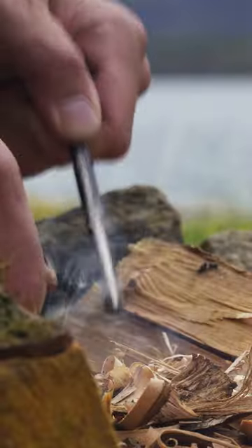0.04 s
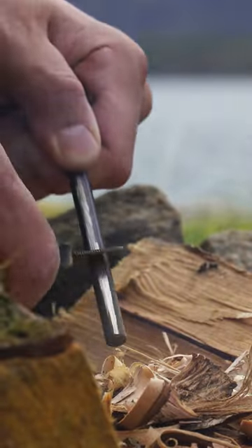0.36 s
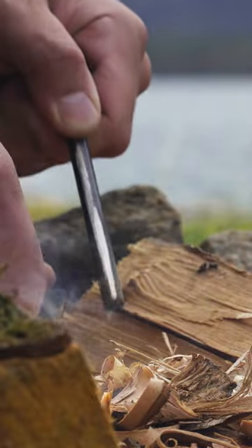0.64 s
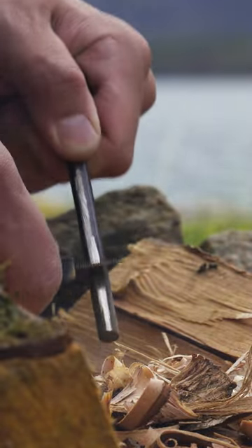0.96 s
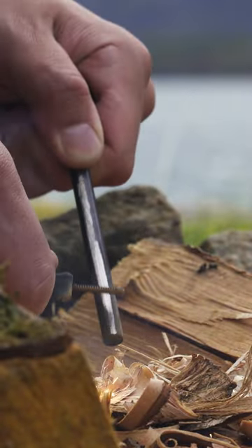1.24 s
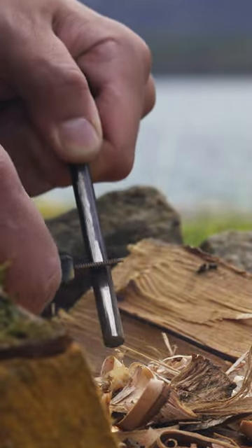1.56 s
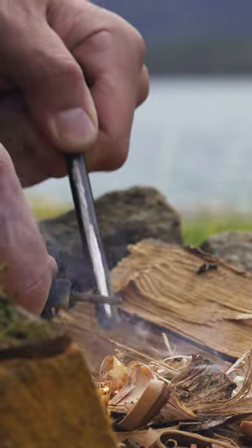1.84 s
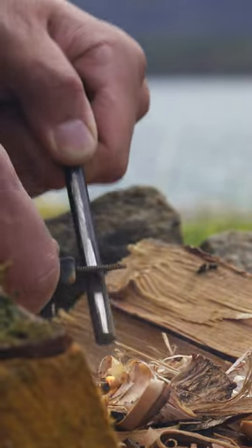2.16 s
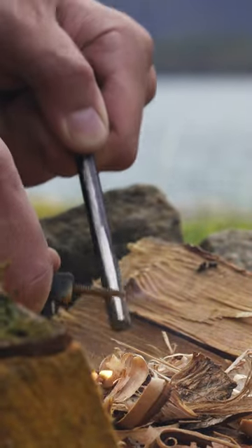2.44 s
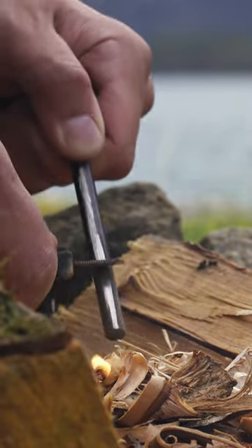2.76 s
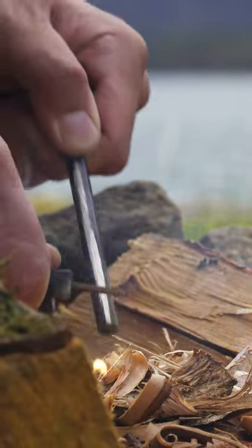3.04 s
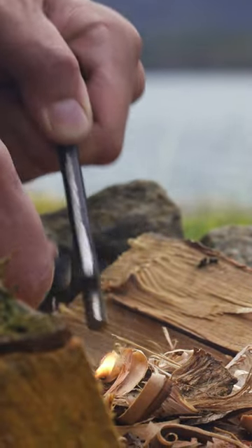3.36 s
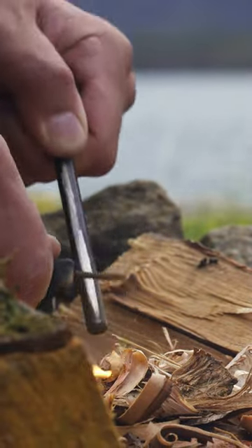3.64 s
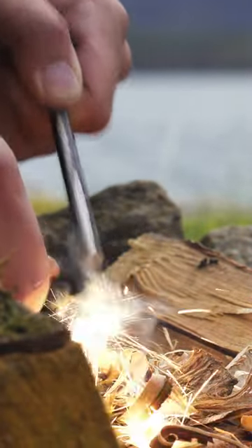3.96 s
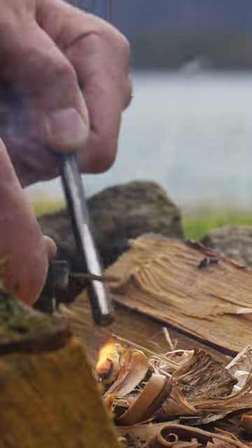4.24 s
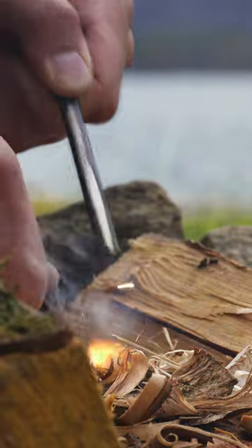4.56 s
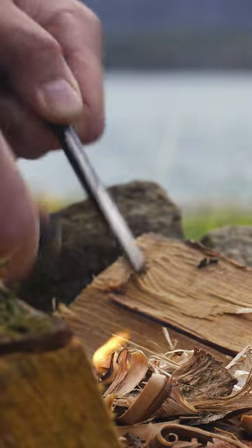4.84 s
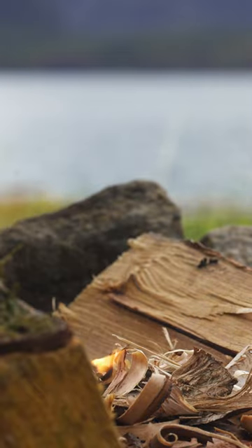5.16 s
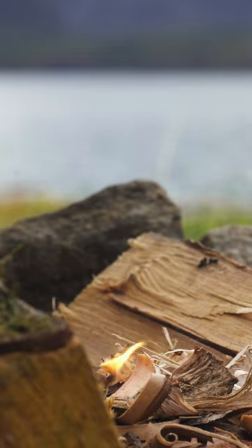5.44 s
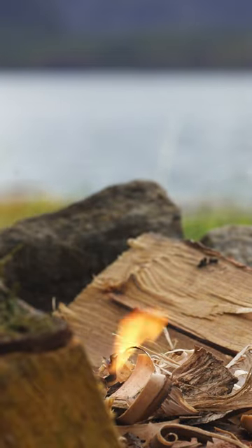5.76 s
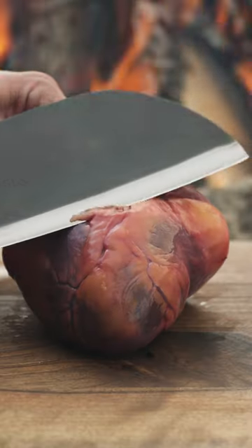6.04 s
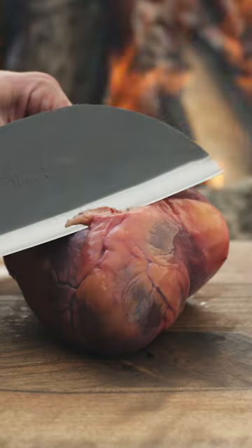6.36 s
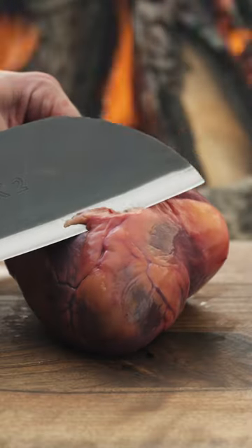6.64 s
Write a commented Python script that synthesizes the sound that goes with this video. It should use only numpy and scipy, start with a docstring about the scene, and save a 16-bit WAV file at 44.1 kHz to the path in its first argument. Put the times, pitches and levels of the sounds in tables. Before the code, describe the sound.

A steel striker rasps down a fire rod nine times with fizzing sparks, in light wind, until a wood fire starts crackling.

```python
"""A sharp, fizzing rasp, close by: a steel striker scraped down a ferro rod over wood shavings,
nine times, on a breezy lake shore. Each stroke is a rush of tiny stick-slip fractures that rings
the steel and the log beneath and throws sparks; between strokes the striker slides back, snags,
squeals and taps the rod. Towards the end the tinder catches and a wood fire swells and crackles."""
import sys
import numpy as np
from scipy import signal
from scipy.fft import rfft, irfft
from scipy.io import wavfile

SR = 44100
rng = np.random.default_rng(int(sys.argv[2]) if len(sys.argv) > 2 else 0)


def wrap_up_sound(samples):
    """Save the sound to the file named by the first command line argument, as 16-bit audio."""
    columns = np.atleast_2d(samples).T
    # keep every value between -1 and 1, then stretch to whole-number steps
    tamed = np.clip(columns, -1, 1)
    steps = np.round(tamed * 32767).astype(np.int16)
    wavfile.write(sys.argv[1], SR, steps)


N = 295469
TIME = np.arange(N) / SR


def undb(db):
    """Decibels to gain."""
    return 10 ** (np.asarray(db) / 20)


def unit(x):
    """Scale to rms 1."""
    return x / np.sqrt(np.mean(x ** 2))


def since(s):
    """Seconds gone by since time s; zero before it."""
    return np.maximum(TIME - s, 0)


def curve(rows):
    """Gain over time from (s, dB) rows."""
    return undb(np.interp(TIME, *np.transpose(rows)))


def swell(s, half):
    """Bell-shaped envelope that peaks at s and is down to 1/e half seconds to either side."""
    return np.exp(-((TIME - s) / half) ** 2)


def add(out, s, sound):
    """Mix a short sound into out from time s on."""
    start = max(int(s * SR), 0)
    part = sound[:max(N - start, 0)]
    out[start:start + len(part)] += part


def wander(rate):
    """Random drift of rms 1 that heads for a new value rate times a second."""
    knots = rng.standard_normal(N // 8)
    return unit(np.interp(TIME * rate, np.arange(len(knots)), knots))


def ring(x, modes):
    """Pass x through damped resonances (Hz, width Hz, dB), keeping the power of white noise."""
    size = 4096
    f = np.arange(1, size // 2 + 2) * SR / size
    power = sum(undb(db) ** 2 / (1 + ((f * f - hz * hz) / (f * width)) ** 2 / 2) ** 2
                for hz, width, db in modes)
    # a struck thing rings only after the blow: make the response causal
    cepstrum = irfft(np.log(power + 1e-9) / 2)
    cepstrum[1:size // 2] *= 2
    cepstrum[size // 2 + 1:] = 0
    response = irfft(np.exp(rfft(cepstrum)))
    return signal.oaconvolve(x, response / np.linalg.norm(response))[:len(x)]


def grit(rate, spread_db, smooth):
    """Tiny fractures of uneven size, rate a second, over a share of smooth rubbing noise."""
    hit = rng.random(N) < rate / SR
    size = undb(spread_db * np.minimum(rng.standard_normal(N), 2)) * rng.choice([-1, 1], N)
    return unit(unit(hit * size) + smooth * rng.standard_normal(N))


def bursts(rows, rise, t60):
    """Envelope of short bursts from (s, dB) rows; rise and t60 are in seconds."""
    out, t = np.zeros(N), TIME[:SR // 10]
    for s, db in rows:
        add(out, s, undb(db) * np.exp(-np.log(1000) * t / t60) * (1 - np.exp(-t / rise)))
    return out


def air(spectrum, flicker_db, flicker_rate):
    """Turbulent noise of a given colour whose octave bands flicker on their own."""
    f = np.arange(1, N // 2 + 2) * SR / N
    hz, db = np.transpose(spectrum)
    noise = rfft(rng.standard_normal(N)) * undb(np.interp(np.log(f), np.log(hz), db))
    octave = np.log2(f / f[-1])
    bands = (irfft(noise * np.maximum(1 - abs(octave + k), 0), N) for k in range(11))
    return unit(sum(band * undb(flicker_db * wander(flicker_rate)) for band in bands))


def press(s, attack, hold, release, build_db=0):
    """Pressure of the edge on the rod as a gain: it lands at s, bears down, holds and eases off."""
    landing_s, attack_db, release_db = 0.001, 11, 22
    t = since(s)
    on, gain = (t > 0) & (t < attack + hold + 2 * release), np.zeros(N)
    t = t[on]
    rising = np.maximum(1 - t / attack, 0)
    building = np.minimum(t / (attack + hold), 1) - .5
    easing = np.maximum((t - attack - hold) / release, 0)
    touching = np.minimum(t / landing_s, 1) * np.minimum(2 - easing, 1)
    gain[on] = touching * undb(build_db * building - attack_db * rising - release_db * easing)
    return gain


# The scrape's three colours. Each row: centre in Hz, width in Hz, relative level in dB.
STEEL_MODES = [(1573, 280, -3.5), (1850, 120, -5), (2250, 560, -3.5), (2820, 620, -12), (3585, 540, -2),
               (3670, 48, -6.5), (4020, 100, -4), (4360, 27, -1.5), (4700, 76, -6), (4620, 1220, -2.5),
               (5120, 63, -25), (6070, 530, -9.5), (7200, 910, -9.5)]  # the bright ring of rod and striker
BODY_MODES = [(176.4, 120, -2.5), (311, 108, 0.5), (472, 125, 0.5), (832, 192, 3), (980, 75, -7)]  # the low weight of hands and log
FIZZ_BANDS = [(7130, 490, -2), (8120, 120, 4.5), (8520, 2700, -4), (9800, 2400, 0), (12200, 1100, -1),
              (13850, 230, 0.5), (13700, 2300, -5.5), (14600, 1200, -5)]  # the sizzle of shavings and sparks
# Hard strokes. Each row: start, attack, hold and release in seconds, rasp level in dB,
# body and fizz sends in dB, level of the smoulder left behind in dB.
STROKES = [ (0.0, 0.00089, 0.041, 0.025, -30, -4.5, -11.5, -54.5),
           (0.556, 0.013, 0.059, 0.027, -31, -3, -6.5, -73),
           (1.083, 0.0044, 0.046, 0.034, -31, -4, -7.5, -73),
           (1.702, 0.0075, 0.038, 0.019, -28.5, -3.5, -6.5, -52.5),
           (2.322, .04, 0.033, 0.021, -33, -2.5, -8.5, -66.5),
           (2.904, 0.012, 0.03, 0.054, -28, -4.5, -8.5, -78),
           (3.495, 0.0037, 0.057, .022, -35.5, -3.5, -10, -61.5),
           (3.975, 0.017, 0.051, 0.044, -28, -4.5, -5.5, -58),
           (4.538, 0.019, 0.042, 0.022, -29.5, -4.5, -8, -73), ]


def strokes():
    """The edge bites and chatters down the rod; the shavings ignite, the first fizzing brightest."""
    flash_db, flash_s = 11, 0.0098
    rasp, body, fizz = np.zeros((3, N))
    for s, attack, hold, release, db, body_db, fizz_db, _ in STROKES:
        force = undb(db) * press(s, attack, hold, release)
        rasp += force
        body += force * undb(body_db)
        fizz += force * undb(fizz_db + flash_db * np.exp(-since(s) / flash_s))
    chatter = unit(undb(2.57 * wander(420)))
    fractures = grit(rate=3200, spread_db=3.5, smooth=0.46) * chatter
    sparks = unit(fractures + 2.7 * chatter * grit(rate=2200, spread_db=5.5, smooth=0.92))
    return (ring(fractures * rasp, STEEL_MODES)
            + undb(0.6) * ring(fractures * body, BODY_MODES)
            + undb(0.5) * ring(sparks * fizz, FIZZ_BANDS))


def hand_echoes(x, share, drift_s):
    """Echoes off the moving hands and the log give the scrape a shifting metallic colour."""
    delays = (lag_s + drift_s * wander(4.4) for lag_s in (.0005, .0011, .0019))
    echoes = sum(np.interp(TIME - delay, TIME, x) for delay in delays)
    return (x + share * echoes) / np.sqrt(1 + 3 * share ** 2)


# The shore's bed of wind and water. Each row: frequency in Hz, relative level in dB.
SHORE_SPECTRUM = [(15, -32), (25, -18), (206, -11), (270, -11), (335, -8.5), (476, -11), (734, -15),
                  (1160, -22.5), (1480, -19), (2050, -28), (4030, -31), (4370, -30.5), (9570, -38),
                  (16000, -45)]
# Low bumps and buffets on the microphone.
# Each row: peak time in seconds, level in dB, half length in seconds.
BUFFETS = [(1.42, -43.5, .015), (1.552, -44.5, 0.011), (1.601, -39.5, 0.019), (2.677, -50.5, 0.083),
           (2.96, -38.5, 0.025), (3.122, -45, 0.027), (3.86, -36, 0.01), (4.12, -48, 0.011),
           (4.808, -40, 0.02), (5.139, -37, 0.0037), (5.303, -45, 0.015), (5.386, -51, 0.033),
           (6.007, -41.5, .06)]


def breeze():
    """Wind and water wash under a slowly building rumble, with short low bumps and buffets."""
    wash = undb(-53.5) * air(SHORE_SPECTRUM, flicker_db=4.0, flicker_rate=13)
    # every buffet rides on a weaker, longer swell of rumble
    swells = sum(undb(db - 12.5) * swell(s, 5 * half) for s, db, half in BUFFETS)
    wind = undb(-73 + 3 * TIME) + swells
    rumble = ring(rng.standard_normal(N), [(39.8, 31.5, -5), (80, 76, -24)])
    rumble *= wind * undb(2 * wander(4.8))
    bumps = sum(undb(db) * swell(s, half) for s, db, half in BUFFETS)
    thump_hz = 66 * 2 ** (0.7 * wander(110))  # a low thump of wavering pitch
    thump = unit(np.sin(2 * np.pi * np.cumsum(thump_hz) / SR))
    low_noise = undb(-12) * ring(rng.standard_normal(N), [(151, 150, 1)])
    return wash + rumble + bumps * (thump + low_noise)


def tinder():
    """Scorched shavings hiss and stray sparks tick after each stroke; at last the tinder catches."""
    ember_db, smoulder_s = -75.5, 0.12
    alight_db, alight_s = -65.5, 4.94
    glow = undb(ember_db) + undb(alight_db) * (TIME > alight_s)
    shower = np.zeros(N)
    for s, attack, hold, release, *_, smoulder_db in STROKES:
        t = since(s + attack + hold + release)
        glow += (t > 0) * undb(smoulder_db) * np.exp(-(t / smoulder_s) ** 2)
        shower += (t > 0) * np.exp(-t / 0.054)
    sizzle = grit(rate=2500, spread_db=10, smooth=0.84)
    hiss = ring(sizzle, [(3900, 3700, 7), (8000, 4000, -5), (12600, 6500, -3)]) * glow
    ticks = grit(rate=120, spread_db=10, smooth=0.15) * shower
    sparks = ring(ticks, [(4200, 8500, 7), (11200, 3900, -14)])
    # the first shower flares with a soft puff
    puff = ring(rng.standard_normal(N), [(187, 125, 2), (700, 1100, -14.5)]) * swell(0.16, 0.1)
    return hiss + undb(-54) * sparks + undb(-49) * puff


# Sharp catches of the edge. Each row: start in seconds, relative level in dB, fizz send in dB.
SNAGS = [(0.0693, -30, -7), (0.2268, -33.5, -9), (0.5502, -23.5, 5.5), (0.6142, -15, -19),
         (0.634, -17, -20), (0.6728, -24, -8), (0.6954, -30, -11), (0.7441, -20, -7), (0.7535, -24, -11),
         (0.902, -31, -18), (0.915, -27.5, -11), (0.932, -31, -8), (1.123, -11, -15), (1.158, -26, -11),
         (1.231, -25, -12), (1.409, -18, -23), (1.453, -15, -15), (1.4658, -21, -11), (1.5101, -24, -11.5),
         (1.6489, -14, -13), (1.689, -16, -5), (1.7495, -18, -13), (1.951, -30.5, -15), (1.971, -28.5, -13),
         (2.0001, -20, -17), (2.1273, -25, -12.5), (2.1428, -29.5, -22), (2.3237, -18.5, -12.5),
         (2.4215, -15.5, -15), (2.445, -19.5, -22), (2.4813, -22, -12), (2.5339, -21.5, -15),
         (2.541, -21.5, -19), (2.5524, -26, -14), (2.571, -30, -15), (2.5854, -27.5, -13), (2.598, -30, -9),
         (2.6638, -35, -14.5), (2.9005, -25, -2), (2.9988, -22.5, -10), (3.024, -19, -14),
         (3.1064, -26.5, -6.5), (3.198, -25.5, -9.5), (3.3305, -30, -22), (3.457, -25, -11),
         (4.0696, -28.5, -12), (4.0928, -18, -8.5), (4.1437, -35, -13), (4.2446, -28, -17),
         (4.286, -17, -15.5), (4.3065, -22, -25), (4.3306, -24.5, -19), (4.5944, -13.5, -19),
         (4.682, -29.5, -17), (4.945, -20, -10.5), (4.953, -30, -12)]


def snags():
    """A caught edge tears free in a few milliseconds of dense fractures."""
    tear = grit(rate=9000, spread_db=1.5, smooth=0.67)
    rasp = tear * bursts([(s, db) for s, db, _ in SNAGS], rise=0.00042, t60=0.02)
    fizz = tear * bursts([(s, db + send) for s, db, send in SNAGS], rise=0.00036, t60=0.017)
    return (undb(-8.5) * ring(rasp, STEEL_MODES)
            + undb(-16) * ring(rasp, BODY_MODES)
            + undb(-0.5) * ring(fizz, FIZZ_BANDS))


# The striker's free ring. Each row: centre in Hz, width in Hz, relative level in dB.
STRIKER_MODES = [(1310, 300, -5), (2335, 430, 2), (2940, 270, -3), (3620, 350, 2), (4050, 370, -0.5),
                 (4950, 630, 0), (5950, 590, -6.5), (7100, 1100, -10), (12000, 3200, -26)]
# Small steel clicks. Each row: start in seconds, relative level in dB.
TAPS = [(0.389, -22.5), (0.5124, -31), (0.5208, -28), (0.5397, -27), (0.7325, -27.5), (0.977, -29.5),
        (2.211, -20.5), (2.79, -33), (2.8858, -33), (3.8891, -15.5), (4.4569, -18), (4.704, -39)]


def taps():
    """The striker is set against the rod: one clean blow and a brief rattle ring it."""
    blows = np.zeros(N)
    for s, db in TAPS:
        blows[int(s * SR)] = undb(db)
    rattle = rng.standard_normal(N) * bursts(TAPS, rise=0.00029, t60=0.012)
    return ring(undb(5) * blows + undb(-13.5) * rattle, STRIKER_MODES)


# Soft lead-ins. Each row: start, attack and hold in seconds, relative level in dB, fizz send in dB.
SKIMS = [ (0.474, .008, 0.017, -52, -4), (1.023, 0.031, .032, -40, 0.5), (1.643, .003, 0.058, -36.5, -5),
         (2.234, .032, 0.058, -40.5, 1.5), (3.397, 0.019, 0.075, -42.5, -1),
         (3.938, 0.036, .006, -33.5, -2.5), ]


def skims():
    """Before it digs in, the edge glides with a fine, even hiss."""
    hiss_bands = [(770, 1200, -5.5), (2380, 600, 0.5), (3530, 1000, 4.5), (5560, 1300, 0)]
    hiss, fizz = np.zeros((2, N))
    for s, attack, hold, db, fizz_db in SKIMS:
        force = undb(db) * press(s, attack, hold, release=0.008)
        hiss += force
        fizz += force * undb(fizz_db)
    rub = grit(rate=5000, spread_db=-3, smooth=0.82) * unit(undb(2.0 * wander(200)))
    return undb(-3.5) * ring(rub * hiss, hiss_bands) + undb(-5.5) * ring(rub * fizz, FIZZ_BANDS)


# Thin squeaks. Each row: centre time and half length in seconds, pitch in Hz, relative level in dB.
SQUEALS = [(0.519, 0.023, 2900, -52), (0.559, 0.0061, 7000, -46), (1.051, 0.014, 6800, -46),
           (1.068, 0.018, 13400, -47), (1.657, 0.013, 6700, -40), (1.698, 0.0077, 13400, -32),
           (2.284, 0.027, 13200, -45), (2.378, 0.015, 6500, -37.5), (2.886, 0.021, 2320, -52.5),
           (2.901, 0.0044, 6750, -32), (3.272, .06, 12000, -60), (3.431, 0.021, 13100, -44.5),
           (3.96, 0.013, 6840, -43.5), (4.542, 0.018, 3180, -44), (4.552, 0.013, 13600, -40)]


def squeals():
    """Friction briefly locks onto a resonance of the steel: a rough, narrow whistle."""
    out, t = np.zeros(N), TIME[:SR // 2]
    middle, catching = t[-1] / 2, np.tanh(wander(350))
    for s, half, hz, db in SQUEALS:
        flutter = undb(10.3 * catching[int(s * SR):][:len(t)])
        whistle = ring(rng.standard_normal(len(t)), [(hz, 450 + 0.048 * hz, 0)])
        envelope = undb(db) * np.exp(-((t - middle) / half) ** 2)
        add(out, s - middle, whistle * flutter * envelope)
    return out


# Light slides along the rod. Each row: start, hold and release in seconds, rasp level in dB,
# body and fizz sends in dB.
SLIDES = [ (0.671, 0.01, 0.051, -47.5, 3, -6), (0.88, 0.011, 0.047, -42.5, -7, -2.5),
          (1.228, 0.03, 0.037, -35.5, -4, -5), (1.295, 0.096, 0.088, -40, -4, -5),
          (1.755, 0.066, 0.072, -35.5, -2.5, -5), (1.925, 0.0037, 0.011, -39.5, -4, -1.5),
          (2.422, 0.065, 0.0055, -44, -0.5, -3), (3.012, 0.042, 0.016, -40, -1.5, -2),
          (3.192, 0.14, .018, -43.5, -4.5, -4.5), (4.153, 0.006, 0.0094, -36, 0, 1),
          (4.282, 0.022, .03, -37.5, -9, -7.5), ]


def slides():
    """With little pressure the edge skips over the rod's ridges: sparser grit in uneven fits."""
    rasp, body, fizz = np.zeros((3, N))
    for s, hold, release, db, body_db, fizz_db in SLIDES:
        force = undb(db) * press(s, attack=0.0052, hold=hold, release=release, build_db=1.8)
        rasp += force
        body += force * undb(body_db)
        fizz += force * undb(fizz_db)
    fits = unit(undb(0.45 * wander(300) + 2.0 * wander(110)))
    skips = grit(rate=2200, spread_db=4.0, smooth=0.2) * fits
    return (ring(skips * rasp, STEEL_MODES)
            + undb(-2.2) * ring(skips * body, BODY_MODES)
            + undb(-2.0) * ring(skips * fizz, FIZZ_BANDS))


# Dull thuds. Each row: start in seconds, relative level in dB.
KNOCKS = [(1.409, -23), (1.453, -36), (3.107, -36), (4.093, -31.5)]


def knocks():
    """The striker lands hard and thuds through the rod into the hands and the log."""
    return ring(rng.standard_normal(N) * bursts(KNOCKS, rise=0.00035, t60=0.016), BODY_MODES)


# The low roar of flames. Each row: frequency in Hz, relative level in dB.
FLAME_SPECTRUM = [(15, -35), (25, -34), (53, -8.5), (111, -0.5), (236, -1.5), (416, -13.5), (607, -14.5),
                  (887, -17), (1190, -18), (1890, -27.5), (2840, -32), (3620, -36), (8830, -39),
                  (16000, -51)]
# The fire's fader, faint until it swells near the end. Each row: time in seconds, level in dB.
FIRE_LEVELS = [(5.0, -57), (5.35, -53.5), (5.9, -40.5), (6.6, -37.5)]
# Wood pops. Each row: start in seconds, relative level in dB, ring in Hz, treble send in dB.
POPS = [(4.853, -40, 6000, -4), (5.274, -30, 3800, -4), (5.4246, -34.5, 2260, -30),
        (5.5538, -26.5, 5160, -25), (5.5811, -25.5, 5970, -14), (5.904, -30, 8800, -15),
        (5.914, -23, 6400, -23), (6.0127, -31, 3790, -16), (6.0591, -18, 6470, -8),
        (6.0655, -18, 5560, -12), (6.131, -35, 2780, -23), (6.63, -32.5, 5590, -2), (6.6858, -7, 3840, -41)]


def fire():
    """Flames flutter and roar; pockets of sap tick and now and then pop, each with its own ring."""
    roar = air(FLAME_SPECTRUM, flicker_db=2.0, flicker_rate=35)
    sap = grit(rate=47, spread_db=12, smooth=0.1)
    ticks = undb(-26) * ring(sap, [(4000, 2700, 0), (9500, 6000, -2)])
    pops, t = np.zeros(N), TIME[:SR // 10]
    envelope = bursts([(0, 0)], rise=0.00057, t60=0.023)[:len(t)]
    for s, db, hz, treble_db in POPS:
        crack = rng.standard_normal(len(t)) * envelope
        wood = ring(crack, [(hz, 0.47 * hz, 0), (2100, 2200, -7), (11000, 7000, -19)])
        snap = ring(crack, [(10400, 5100, 0)])
        add(pops, s, undb(db) * (wood + undb(treble_db) * snap))
    return (roar + ticks) * curve(FIRE_LEVELS) + undb(-8) * pops


def scene():
    """A mono mix, close and in the open air, without reverberation."""
    scraping = skims() + strokes() + slides() + snags() + knocks()
    rod = hand_echoes(scraping, share=0.12, drift_s=0.00011)
    return (rod + squeals() + taps() + fire() + tinder() + breeze())[None]


def record(dry):
    """A steep low-pass trims the very top, above 16 kHz."""
    return signal.sosfilt(signal.ellip(10, .2, 70, 16000, fs=SR, output="sos"), dry)


dry = scene()
out = record(dry)
wrap_up_sound(out)
```